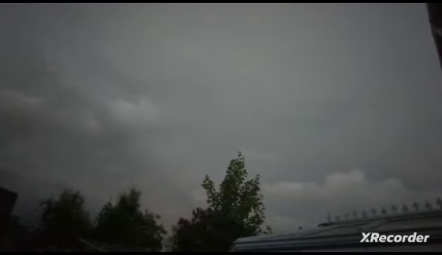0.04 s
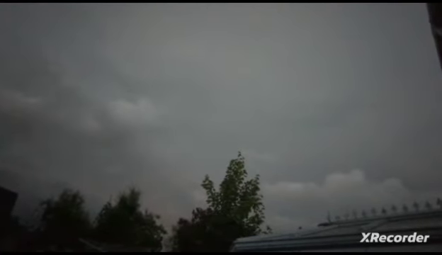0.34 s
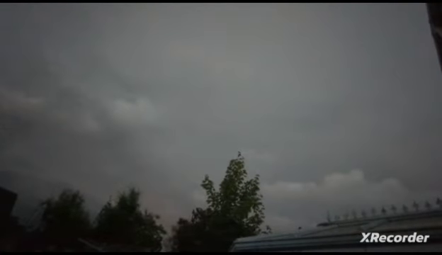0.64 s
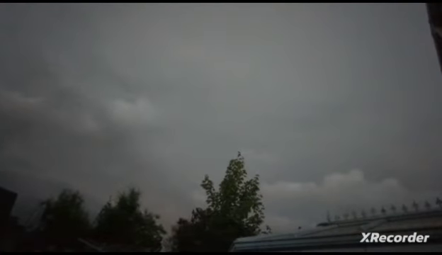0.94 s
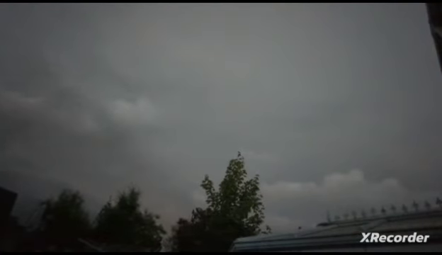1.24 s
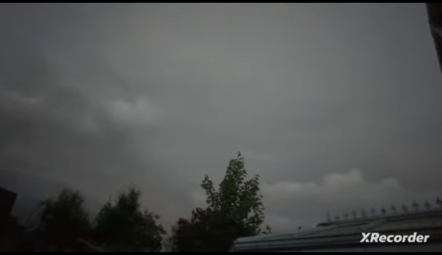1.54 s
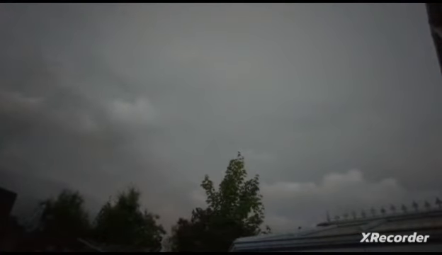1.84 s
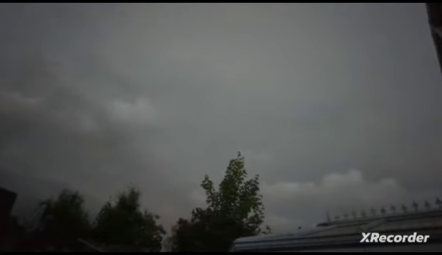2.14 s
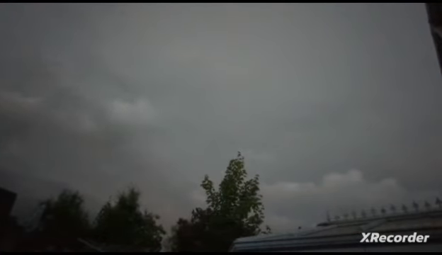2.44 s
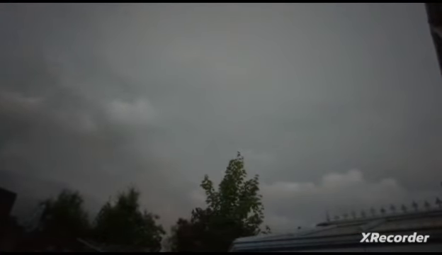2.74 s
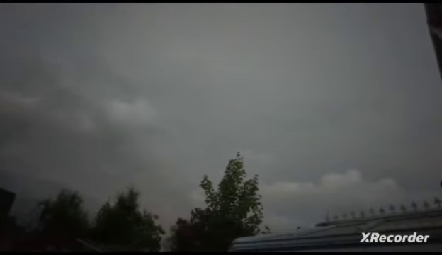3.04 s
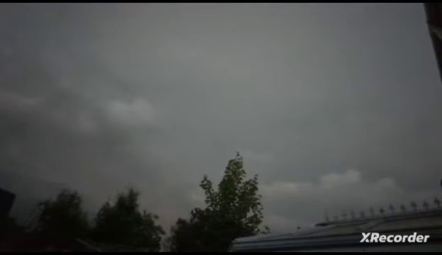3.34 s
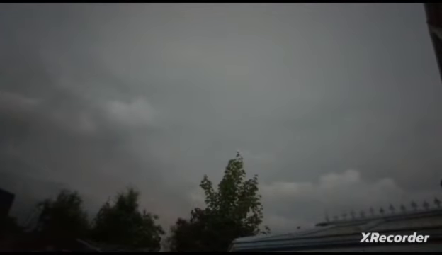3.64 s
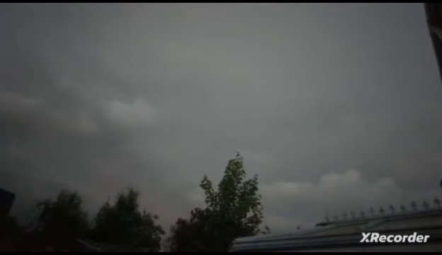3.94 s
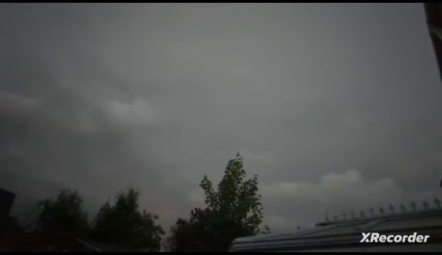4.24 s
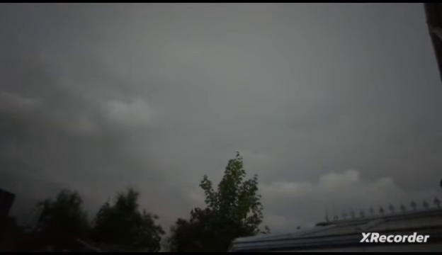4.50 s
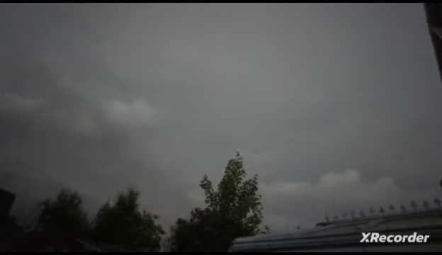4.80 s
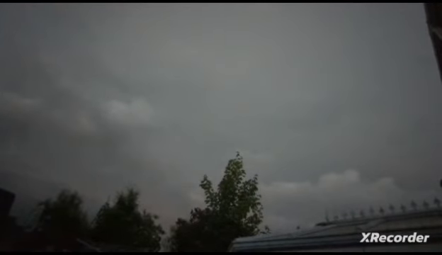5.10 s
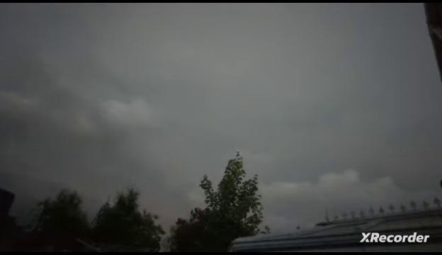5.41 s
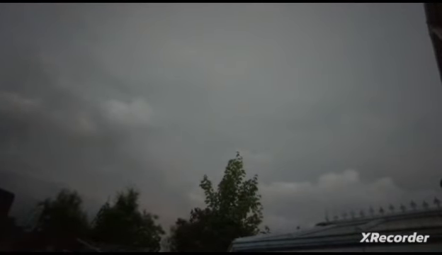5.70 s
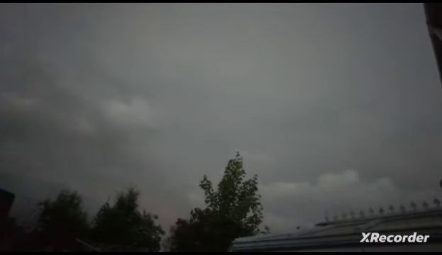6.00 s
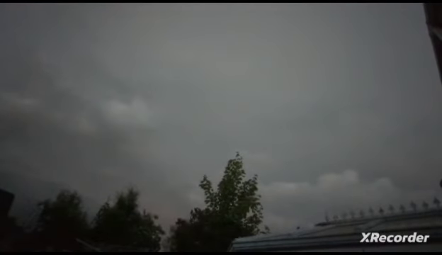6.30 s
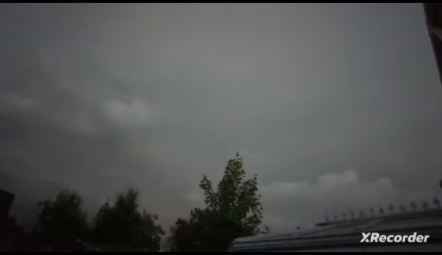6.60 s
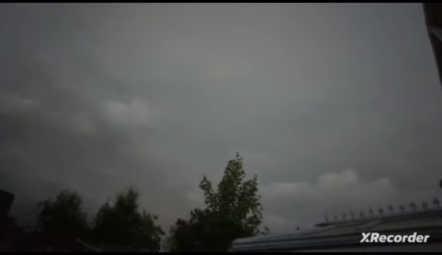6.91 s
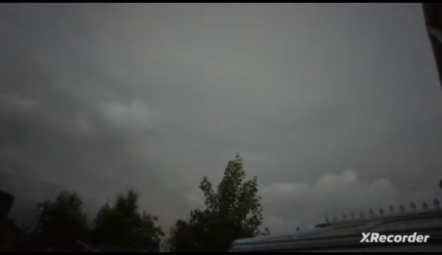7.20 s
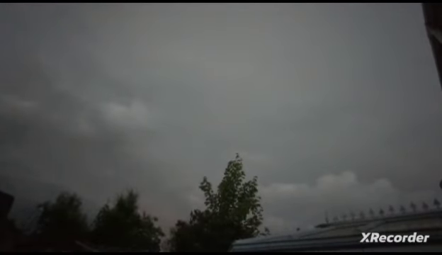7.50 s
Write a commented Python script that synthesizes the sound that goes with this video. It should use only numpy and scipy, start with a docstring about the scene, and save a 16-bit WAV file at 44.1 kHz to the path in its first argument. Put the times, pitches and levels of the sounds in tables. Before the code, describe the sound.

Distant thunder rolls without a break for nearly eight seconds, heard outdoors beside a house. It opens as a low rumble with a dull clap, then swells from 0.5 seconds to its loudest at about 1 second. It stays strong until about 2.5 seconds, with muffled claps, short hollow knocks and deep booms ringing between nearby walls. The roll then eases unevenly, with heavy thuds around 3.7 and 4.2 seconds and a brief surge near 4.6. It grumbles more quietly from 5 to 6.5 seconds, then swells again with more claps at about 7.1 and 7.6 seconds. Far below the thunder, light rain hisses steadily and a very faint cricket trills on the left. Leaves give two barely audible rustles near 6 and 7 seconds.

```python
"""Thunder rolls across an overcast sky, heard from beside a house.
Crowds of shock waves from the far lightning channel merge into a rumble that swells, eases and
swells again. Single claps and hollow notes stand out of it, and the nearby walls boom along.
Behind it faint rain hisses, a cricket trills with its wings, and late on leaves rustle twice."""
import sys
import numpy as np
from scipy import signal
from scipy.fft import rfft, irfft, next_fast_len
from scipy.io import wavfile
from scipy.ndimage import uniform_filter1d

SR = 44100
rng = np.random.default_rng(int(sys.argv[2]) if len(sys.argv) > 2 else 0)


def bounce(signal):
    """Save signal as a 16-bit WAV file at the path given by the first command-line argument."""
    frames = np.transpose(np.atleast_2d(signal))
    limited = np.clip(frames, -1, 1)
    pcm = np.round(limited * 32767).astype(np.int16)
    wavfile.write(sys.argv[1], SR, pcm)


N = 341775
TIME = np.arange(N) / SR
FFT_SIZE = 2 * next_fast_len(N // 2 + SR // 2)
FREQS = np.maximum(np.arange(FFT_SIZE // 2 + 1) * SR / FFT_SIZE, 1)


def from_db(db):
    """Turn decibels into a number to multiply by."""
    return 10 ** (np.asarray(db) / 20)


def rms_one(x):
    """Scale a signal to an average (rms) strength of 1."""
    return x / np.sqrt(np.mean(x ** 2))


def in_time(rows, column=1):
    """Join timed points into a curve, one value per sample."""
    rows = np.array(rows)
    return np.interp(TIME, rows[:, 0], rows[:, column])


def across_hz(points):
    """Join (Hz, value) points into a curve from bass to treble."""
    hz, value = np.transpose(points)
    return np.interp(np.log(FREQS), np.log(hz), value)


def filtered(x, response):
    """Turn each frequency of a signal up or down."""
    return irfft(rfft(x, FFT_SIZE) * response, FFT_SIZE)[..., :N]


def ringing_filter(gain_db):
    """A filter that rings after a blow, never before (minimum phase)."""
    cepstrum = irfft(np.log(from_db(gain_db)), FFT_SIZE)
    cepstrum[1:FFT_SIZE // 2] *= 2
    cepstrum[FFT_SIZE // 2 + 1:] = 0
    return np.exp(rfft(cepstrum))


def below(edge_hz, order=12):
    """A filter that keeps what lies below the edge; a higher order cuts more steeply."""
    return 1 / (1 + (FREQS / edge_hz) ** order)


def drift(rate_hz):
    """A slow random wobble with a typical size of 1."""
    return rms_one(filtered(rng.standard_normal(N), below(rate_hz, order=4)))


def impulses(per_s, spread_db):
    """Two unrelated streams of random clicks of uneven size."""
    hits = rng.random((2, N)) < per_s / SR
    signs = rng.choice([-1, 1], (2, N))
    return rms_one(hits * signs * from_db(spread_db * rng.standard_normal((2, N))))


# How alike thunder is left and right. Each row: frequency in Hz, likeness (1 same, -1 opposite).
SIDE_LIKENESS = [(25, 0.74), (55, 0.98), (108, 1), (135, .74), (160, 0.99), (300, 0.68), (400, 0.91),
                 (555, 0.45), (670, 0.6), (950, 0.13), (1500, -.3), (2200, -0.45)]

def left_and_right(pair):
    """Long waves reach both sides alike, short ones differ."""
    alike = np.clip(across_hz(SIDE_LIKENESS), -0.999, 0.999)
    shared = filtered(pair[0], np.sqrt(1 + alike))
    opposed = filtered(pair[1], np.sqrt(1 - alike))
    return np.array([shared + opposed, shared - opposed])


# The echo off the ground. Each row: time in seconds, delay in milliseconds.
GROUND_DELAYS = [(0, 4.4), (1.3, 5.0), (1.55, 4.45), (4.0, 4.25), (4.4, 5.5), (5.1, 5.5), (5.6, 4.2),
                 (6.8, 4.3), (7.15, 8.6)]

def ground_echo(x, echo_db=-11):
    """Add a weak echo whose delay slides as the sound comes from other parts of the sky."""
    earlier = TIME - in_time(GROUND_DELAYS) / 1000
    return x + from_db(echo_db) * np.array([np.interp(earlier, TIME, side) for side in x])


# A wandering resonance. Each row: time in seconds, pitch in Hz, boost in dB.
HOLLOW_PATH = [(0, 670, 4), (0.9, 717, 8.5), (1.3, 584, 4.5), (1.55, 391, 4), (2.05, 438, 4), (2.5, 392, 6),
               (2.98, 427, 8.5), (3.3, 416, 4.5), (3.8, 418, 6.5), (4.4, 476, 4.5), (4.75, 660, 4.5),
               (5.05, 450, 3), (5.4, 432, 0), (6.1, 438, 2), (6.35, 444, 5.5), (6.55, 430, 1),
               (6.82, 445, 4), (7.05, 520, 2.5), (7.3, 547, 4), (7.75, 587, 5.5)]

def hollowed(x, reach_hz=45):
    """A resonance slides through the roar and makes it sound hollow."""
    phase = 2 * np.pi * np.cumsum(in_time(HOLLOW_PATH)) / SR
    waves = (np.cos(phase), np.sin(phase))
    # pick out the sound close to the moving pitch
    band = sum(2 * wave * filtered(x * wave, below(reach_hz, order=4)) for wave in waves)
    return x + (from_db(in_time(HOLLOW_PATH, column=2)) - 1) * band


def surge(start, length, attack_s=0.02, release_s=0.031):
    """A curve that rises quickly to 1, holds and dies away."""
    rise = np.clip((TIME - start) / attack_s, 0, 1)
    return rise * np.exp(-np.maximum(TIME - start - length, 0) / release_s)


def dips(rows, depth_db, lead_s, width_s):
    """A smooth dip, in dB, just ahead of each event."""
    return depth_db * sum(np.exp(-((TIME - start + lead_s) / width_s) ** 2) for start, *_ in rows)


# Deep thuds. Each row: start in seconds, length in seconds, boost in dB, pitch in Hz.
DEEP_THUDS = [(0.165, 0.11, 6.5, 77.4), (0.706, 0.07, 4, 68), (0.712, 0.06, 1, 186), (0.866, 0.09, 8, 67.7),
              (0.875, 0.06, 5, 205), (1.096, 0.049, 9, 78), (1.84, 0.063, 9, 62), (2.07, 0.06, 1.5, 190),
              (2.468, 0.15, 8, 76), (2.846, 0.041, 8, 188), (3.055, 0.056, 6.5, 85.4),
              (3.496, 0.06, 7.5, 62.5), (3.742, 0.07, 12.5, 76.5), (4.2, 0.068, 11.5, 71.5),
              (4.522, 0.073, 7, 116), (4.755, 0.13, 8, 76), (4.968, 0.15, 8.5, 70), (5.1, 0.23, 3.5, 62),
              (5.35, 0.15, 8, 60), (5.52, 0.1, 5, 105), (5.725, 0.048, 9, 88), (6.012, 0.059, 6.5, 218),
              (6.257, 0.12, 8, 57), (6.423, 0.14, 8.5, 114), (6.757, 0.26, 6, 60.6), (7.023, 0.13, 5, 91.5),
              (7.181, 0.16, 9.5, 56.4)]

def thuds_at(hz, reach_octaves=0.51):
    """A long, far stretch of lightning arrives at once, boosting (in dB) bands near the thud's pitch."""
    return sum(boost_db * np.exp(-(np.log2(hz / pitch) / reach_octaves) ** 2) * surge(start, length)
               for start, length, boost_db, pitch in DEEP_THUDS)


# The roll, as more or less of the lightning is heard at once. Each row: time in seconds, level in dB.
ROLL_LEVELS = [(0, -10), (.13, -10), (.45, -8.5), (.6, -4), (.74, -2), (.92, -1.35), (1.4, -4.5),
               (2.12, -4.5), (2.3, -7), (2.55, -6), (2.8, -10.5), (3.15, -9), (3.25, -13.5), (3.39, -12),
               (3.46, -8.5), (3.88, -10.5), (4.02, -15.5), (4.48, -15), (4.64, -7.5), (5.2, -15),
               (6.24, -14), (6.32, -11.5), (6.55, -14), (6.75, -12), (7.1, -6.5), (7.4, -11), (7.6, -3.5),
               (7.75, -8)]
# Flurries of sharper shocks from nearer side branches.
# Each row: start in seconds, length in seconds, level change in dB.
BRANCH_FLURRIES = [(.07, 0.13, 3), (.54, 0.41, -1.5), (1.02, 0.12, 1), (3.74, 0.047, 4.5),
                   (4.35, 0.083, 5.5), (4.54, .06, 3), (4.72, 0.1, 5), (5.75, 0.02, 5.5), (6.6, 0.1, 4.5),
                   (6.93, 0.057, 4.5)]

def roll_levels(throb_db=1.26, throb_hz=10.5, crackle_loss_db_per_s=0.78):
    """Levels in dB of five bands, low to high: all follow the roll, and each throbs on its own."""
    roll_db = in_time(ROLL_LEVELS)
    flurry_db = sum(db * surge(start, length) for start, length, db in BRANCH_FLURRIES)
    # a clap or boom gathers the shocks around it, so the roll sags just before it
    lull_db = dips(SINGLE_CLAPS, depth_db=0.66, lead_s=0.045, width_s=0.029)
    sag_db = dips(WALL_BOOMS, depth_db=2.5, lead_s=0.012, width_s=0.026)
    # each band starts from its base level and takes its share of the roll
    depth_db = -41.5 + 0.66 * roll_db + thuds_at(hz=58.3) - sag_db
    bass_db = -30 + 1.114 * roll_db + thuds_at(hz=100) - sag_db
    growl_db = -30.5 + 1.1 * roll_db + thuds_at(hz=227) - lull_db
    roar_db = -33.5 + 0.97 * roll_db + 0.83 * flurry_db - lull_db
    crackle_db = -40.5 + roll_db + flurry_db - lull_db - crackle_loss_db_per_s * TIME
    return [db + throb_db * drift(throb_hz) for db in (depth_db, bass_db, growl_db, roar_db, crackle_db)]


def at_level(x, level_db, even_s):
    """Even out a sound's slow swings, then make it follow a level curve."""
    power = uniform_filter1d(x.mean(axis=0) ** 2, int(even_s * SR))
    power = uniform_filter1d(power, int(even_s * SR / 2))
    return x / np.sqrt(np.maximum(power, 1e-20)) * from_db(level_db)


# Thunder's tone after kilometres of air. Each row: frequency in Hz, relative level in dB.
THUNDER_TONE = [(22, -23.5), (38, -23.5), (50, -11.5), (74, -11), (146, -9), (175, 0), (245, -1), (315, -2),
                (425, -4), (560, -8), (1000, -15.5), (1900, -31), (3000, -68), (9000, -105)]
# Ringing between the walls and under the eaves. Each row: pitch in Hz, width in Hz, boost in dB.
WALL_RINGS = [(59, 27, 11.5), (95.3, 22, 14.5), (119, 51, 11), (186, 16, 0.5), (354, 54, 3), (493, 27, 2),
              (743, 140, 2.5)]

def rumble(clump_db=0.97, clump_hz=30, air_loss_db_per_s=3.0, air_hz=1250):
    """Every kink in the lightning sends a shock; they come in clumps, dulled by air, and ring the walls."""
    shocks = impulses(per_s=3500, spread_db=0.5) * from_db(clump_db * drift(clump_hz))
    walls_db = sum(boost / (1 + (2 * (FREQS - hz) / width) ** 2) for hz, width, boost in WALL_RINGS)
    tone = ringing_filter(across_hz(THUNDER_TONE) + walls_db)
    arriving = left_and_right(filtered(ground_echo(shocks), tone))
    bass_hz, growl_hz, roar_hz, crackle_hz = 74, 140, 330, 800   # where each band begins
    depth_db, bass_db, growl_db, roar_db, crackle_db = roll_levels()
    depth = at_level(filtered(arriving, below(bass_hz)), depth_db, even_s=0.25)
    bass = at_level(filtered(arriving, below(growl_hz) - below(bass_hz)), bass_db, even_s=0.13)
    growl = at_level(filtered(arriving, below(roar_hz) - below(growl_hz)), growl_db, even_s=0.14)
    roar = at_level(filtered(arriving, below(crackle_hz) - below(roar_hz)), roar_db, even_s=0.14)
    crackle = at_level(filtered(arriving, 1 - below(crackle_hz)), crackle_db, even_s=0.91)
    # later sound has come farther, so the air has taken more of its treble
    kept = from_db(-air_loss_db_per_s * TIME)
    crackle = kept * crackle + (1 - kept) * filtered(crackle, below(air_hz, order=6))
    return depth + bass + growl + hollowed(roar) + crackle


# The tone of the rain. Each row: frequency in Hz, relative level in dB.
RAIN_TONE = [(200, -10.5), (900, 3), (1600, -2), (2000, -3.5), (2500, -10.5), (3200, -18), (4000, -20.5),
             (5000, -24), (6700, -24.5), (8000, -29), (10000, -31.5), (13000, -34), (15500, -30.5)]

def rain(level_db=-63, drops_db=-15):
    """Far drops merge into a hiss; a few nearer ones tick."""
    patter = rng.standard_normal((2, N)) + from_db(drops_db) * impulses(per_s=60, spread_db=3.5)
    return from_db(level_db) * rms_one(filtered(patter, ringing_filter(across_hz(RAIN_TONE))))


def cricket(pitch_hz=2821, strokes_per_s=29.7, level_db=-71.5, right_db=-13, uneven_db=2.25):
    """A cricket far to the left: each closing of its wings rings the same short note afresh."""
    strokes = np.cumsum(strokes_per_s * (1 + 0.025 * drift(3))) / SR
    pulses = np.abs(np.sin(np.pi * strokes)) * from_db(level_db + uneven_db * drift(40))
    phase = 2 * np.pi * (pitch_hz * TIME + rng.random(N)[strokes.astype(int)])
    # the tone reaches the right side a quarter cycle late
    return pulses * np.array([np.sin(phase), -from_db(right_db) * np.cos(phase)])


# Thunderclaps. Each row: start in seconds, level in dB, ring pitch in Hz, ring fade time in seconds.
SINGLE_CLAPS = [(0.09, -21, 289, 0.014), (0.25, -26, 420, 0.03), (0.492, -26, 348, 0.0056),
                (0.566, -23.5, 417, .015), (0.658, -22.5, 245, 0.01), (0.71, -17.5, 240, 0.0071),
                (0.761, -17, 115, 0.016), (0.897, -18, 613, 0.0098), (0.928, -19, 213, 0.015),
                (1.166, -22.5, 211, 0.028), (1.293, -16, 217, 0.0091), (1.511, -22, 421, 0.029),
                (1.565, -24.5, 198, 0.0094), (1.609, -23, 385, 0.0084), (1.844, -22, 414, 0.0077),
                (1.982, -25.5, 400, 0.0088), (2.032, -25, 433, 0.0069), (2.059, -23.5, 460, 0.014),
                (2.54, -20.5, 386, 0.011), (2.699, -23.5, 370, 0.0076), (3.162, -23.5, 239, 0.0078),
                (3.44, -25, 233, 0.021), (3.509, -27.5, 342, 0.0093), (3.61, -24, 218, 0.02),
                (3.761, -26.5, 443, 0.01), (4.066, -35.5, 423, 0.0082), (4.259, -28, 193, 0.021),
                (4.366, -30.5, 512, 0.015), (4.567, -29, 480, 0.014), (4.639, -24, 416, 0.0074),
                (4.75, -28.5, 417, 0.0082), (6.154, -34, 388, 0.015), (6.288, -29, 402, 0.0087),
                (6.638, -30, 402, .01), (6.897, -29, 452, 0.0071), (7.108, -24.5, 335, 0.014),
                (7.148, -23, 259, 0.026), (7.602, -20, 352.4, 0.038), (7.734, -21.5, 351.4, 0.034)]
# The tone of a clap. Each row: frequency in Hz, relative level in dB.
CLAP_TONE = [(40, -32), (130, -12), (280, -6.5), (390, 0), (520, 3), (720, -7), (1100, -24), (2000, -50),
             (9000, -105)]

def claps(scatter_s=0.016, scatter_db=-24, crack_db=-7, ring_db=-2, rise_s=0.002):
    """Lightning lying side-on arrives as one shock, with a hollow ring and scatter from the roofs."""
    fronts, trail, rings = np.zeros((2, N)), np.zeros(N), np.zeros(N)
    for start, level_db, hz, fade_s in SINGLE_CLAPS:
        at = int(start * SR)
        age = TIME[:min(N - at, SR // 8)]
        span = slice(at, at + len(age))
        fronts[0, at] = -from_db(level_db)
        trail[span] += from_db(level_db + scatter_db) * np.exp(-age / scatter_s)
        ring_shape = np.exp(-age / fade_s) - np.exp(-age / rise_s)
        rings[span] -= from_db(level_db + ring_db) * np.sin(2 * np.pi * hz * age) * ring_shape
    scatter = trail * impulses(per_s=2500, spread_db=3.0)
    tone = ringing_filter(across_hz(CLAP_TONE))
    cracks = filtered(fronts + scatter, tone / np.abs(irfft(tone)).max())
    return from_db(crack_db) * left_and_right(cracks) + filtered(rings, below(1400, order=6))


# Hollow notes. Each row: middle in seconds, half length in seconds, pitch in Hz, level in dB.
HOLLOW_NOTES = [(0.099, .006, 578, -28.5), (1.393, 0.0057, 754, -29), (1.52, 0.0081, 410, -20.5),
                (1.601, .01, 384, -27), (2.065, 0.0064, 465, -24), (2.545, .008, 393, -24),
                (3.168, 0.0061, 300, -29.5), (3.768, .008, 440, -27), (4.644, 0.0058, 420, -22.5),
                (6.982, 0.013, 833, -41.5), (7.302, 0.0048, 844, -38.5), (7.613, 0.015, 599, -29),
                (7.738, 0.0075, 618, -30)]

def hollow_notes():
    """Very short swells of one pitch stick out of the rumble like soft knocks."""
    out = np.zeros(N)
    for middle, half_s, hz, level_db in HOLLOW_NOTES:
        offset = TIME - middle
        out += from_db(level_db) * np.exp(-(offset / half_s) ** 2) * np.sin(2 * np.pi * hz * offset)
    return out


# Deep booms. Each row: start in seconds, level in dB, pitch in Hz, fade time in seconds.
WALL_BOOMS = [(0.74, -20, 97.2, 0.048), (0.885, -25.5, 66.6, 0.065), (0.946, -23.5, 93.7, 0.069),
              (1.126, -24, 86.7, 0.035), (1.845, -23.5, 89.7, 0.046), (2.085, -22.5, 96.2, 0.054),
              (2.159, -28, 72, .025), (2.505, -24, 84, 0.037), (3.155, -32.5, 125, .01),
              (3.578, -29, 133, .025), (3.897, -31, 126, .02), (5.04, -32.5, 88, 0.058),
              (5.56, -33, 92.5, .06), (7.185, -28.5, 61.5, 0.073), (7.68, -29.5, 66, .05)]

def booms(rise_s=0.0067):
    """The heaviest shocks set the air between the walls swinging at one low pitch."""
    out = np.zeros(N)
    for start, level_db, hz, fade_s in WALL_BOOMS:
        age = np.maximum(TIME - start, 0)
        swing = (1 - np.exp(-(age / rise_s) ** 2)) * np.exp(-age / fade_s)
        out += from_db(level_db) * swing / swing.max() * np.sin(2 * np.pi * hz * age)
    return out


# Brief rustles. Each row: middle in seconds, half length in seconds, level in dB.
LEAF_RUSTLES = [(5.983, .06, -84), (7.071, 0.071, -83.5)]
# The tone of the leaves. Each row: frequency in Hz, relative level in dB.
LEAF_TONE = [(3000, -38.5), (5000, -5.5), (6200, -3), (7500, -14), (12000, -25)]

def leaves():
    """Small gusts brush leaves together in a soft hiss."""
    gusts = sum(from_db(db) * np.exp(-((TIME - middle) / half_s) ** 2)
                for middle, half_s, db in LEAF_RUSTLES)
    return gusts * rms_one(filtered(rng.standard_normal((2, N)), from_db(across_hz(LEAF_TONE))))


def scene(left_db=0.15):
    """Thunder, a touch stronger on the left, over the quiet background."""
    thunder = (rumble() + booms() + claps() + hollow_notes()) * from_db([[left_db], [-left_db]])
    return thunder + rain() + leaves() + cricket()


def record(dry, bass_cut_hz=29, treble_cut_hz=15700):
    """Small microphones lose the deepest bass; the highest treble is cut steeply."""
    heard = filtered(dry, 1 - below(bass_cut_hz, order=4))
    return signal.sosfilt(signal.cheby2(16, 60, treble_cut_hz, fs=SR, output="sos"), heard)


dry = scene()
out = record(dry)
bounce(out)
```